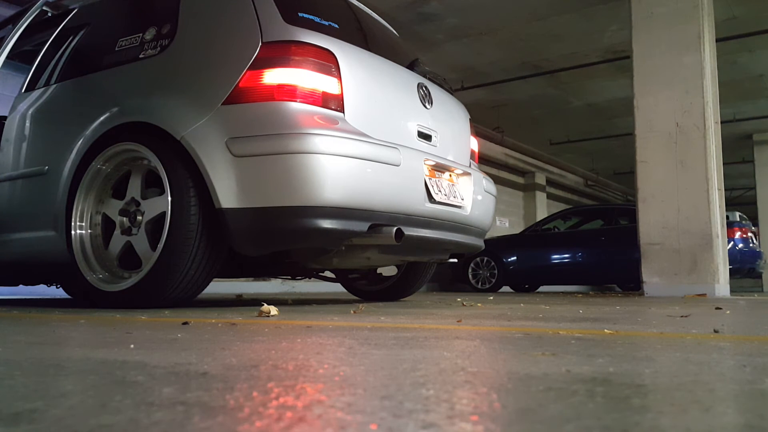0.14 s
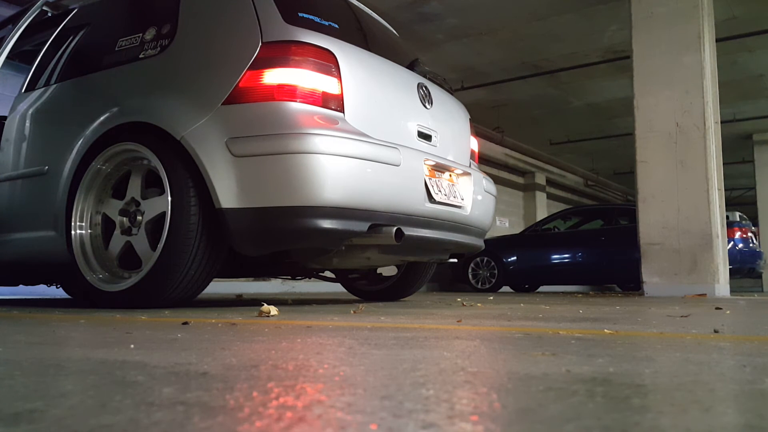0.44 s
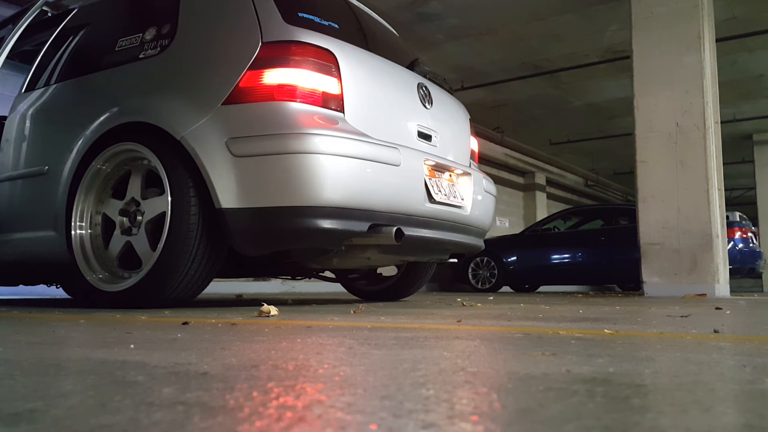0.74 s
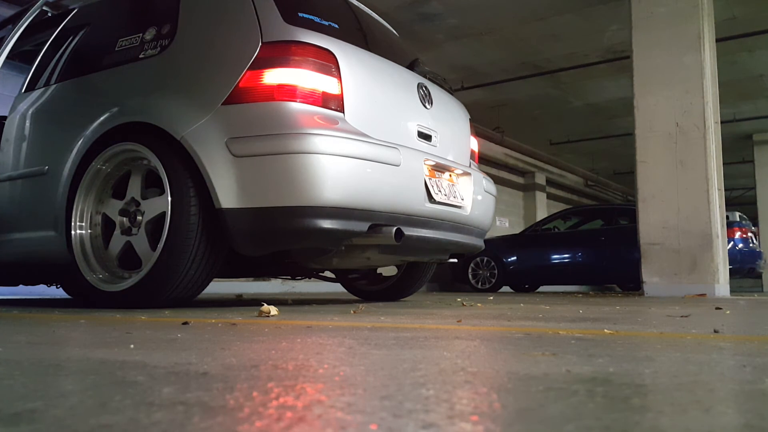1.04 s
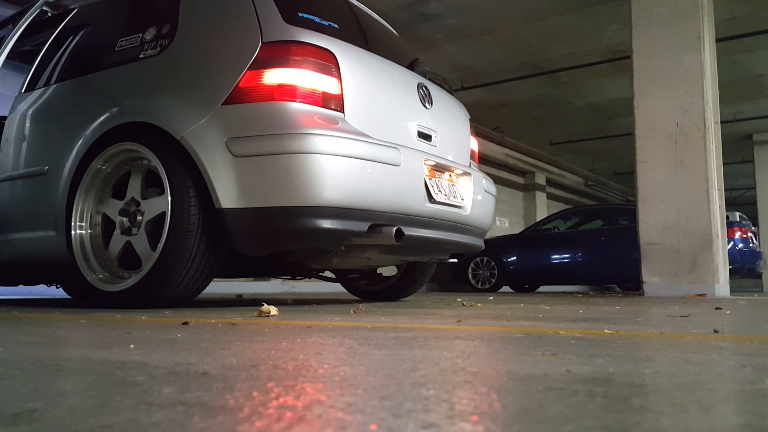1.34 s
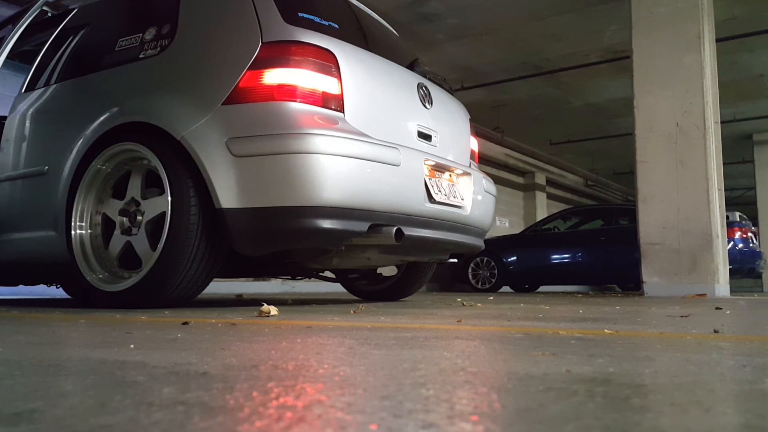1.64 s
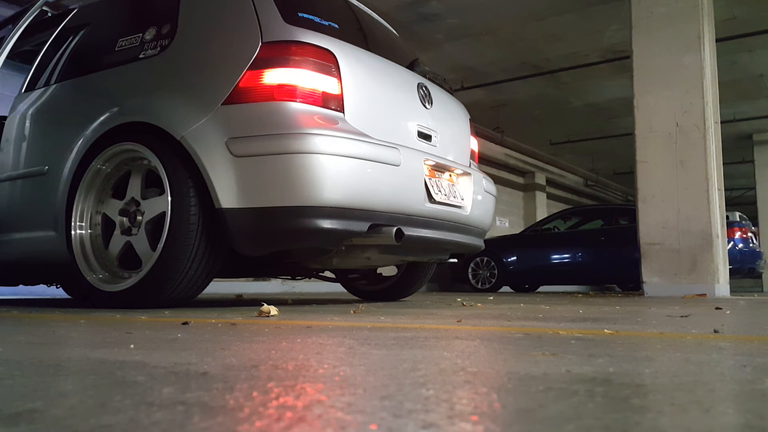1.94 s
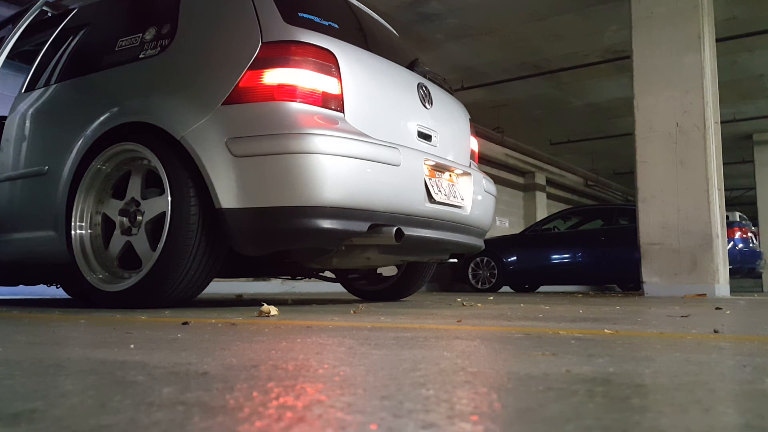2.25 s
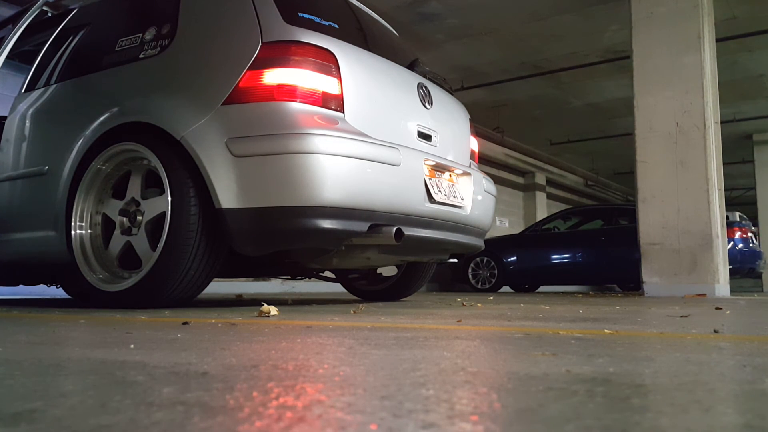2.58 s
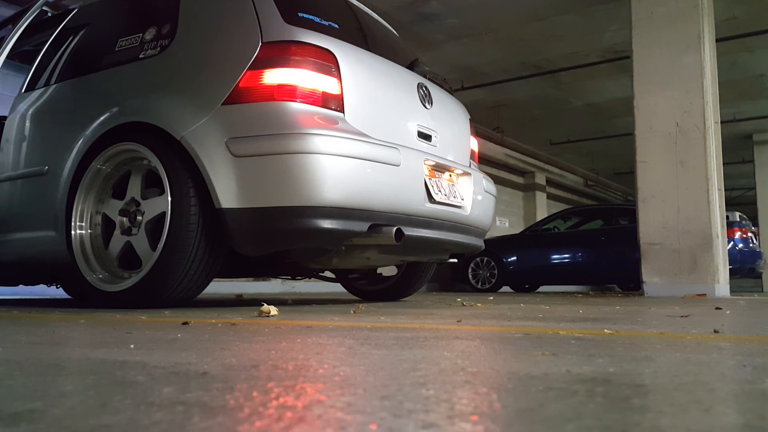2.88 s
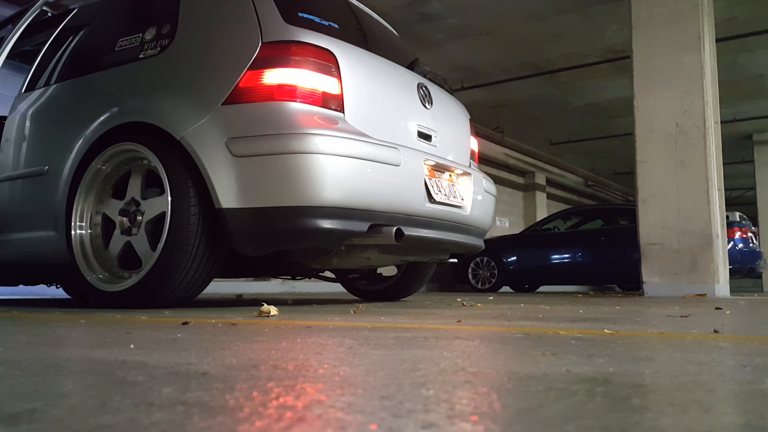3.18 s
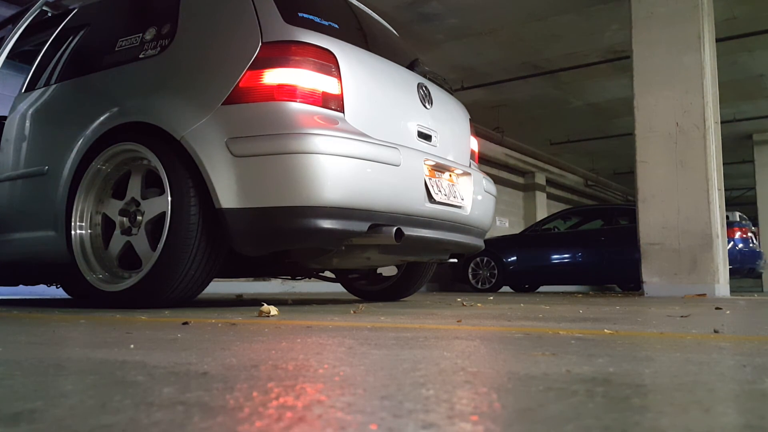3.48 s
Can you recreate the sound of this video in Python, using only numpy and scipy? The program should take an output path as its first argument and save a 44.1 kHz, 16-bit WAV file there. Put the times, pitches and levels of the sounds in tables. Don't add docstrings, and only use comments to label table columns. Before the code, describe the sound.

Rumbling car exhaust in a concrete garage, revved once sharply, with a breathy whistle sliding downward

```python
import sys
import numpy as np
from scipy import signal
from scipy.fft import rfft, irfft, next_fast_len
from scipy.io import wavfile
from scipy.ndimage import map_coordinates

SR = 44100
rng = np.random.default_rng(int(sys.argv[2]) if len(sys.argv) > 2 else 0)


def makeup_ratio(level_db):
    decades = np.asarray(level_db, float) / 20
    return 10 ** decades


def unload_wav(signal):
    wavfile.write(
        sys.argv[1],
        SR,
        np.round(np.clip(np.atleast_2d(signal).T, -1, 1) * 32767).astype(np.int16),
    )


N = 159642

# time in seconds, firings per second.
FIRING_RATE = [(0.0, 50.53), (0.16, 46.27), (0.36, 43.56), (0.58, 40.2), (0.82, 39.42), (0.92, 49.21),
               (0.99, 59.66), (1.08, 77.11), (1.14, 85.5), (1.19, 89.28), (1.37, 81.68), (1.72, 64.85),
               (2.11, 47.18), (2.25, 44.67), (2.45, 47.22), (2.7, 47.48), (2.87, 43.67), (3.62, 49.46)]
# time in seconds, level in dB, level of the second order in dB.
EXHAUST_LEVEL = [(0, -2, -9.5), (.17, -3, 0), (.3, -3.5, -2.5), (.62, 0, 4), (.78, -2.5, -11),
                 (.92, 1, 3.5), (1.03, -3.5, -8.5), (1.17, -4.5, -1.5), (1.55, -8.5, -6.5),
                 (1.72, -13.5, -9), (1.95, -2.5, -3.5), (2.25, -3.5, -4.5), (2.45, -0.5, -3.5),
                 (2.85, 0, 0), (3.1, -5, -10), (3.23, -7.5, -16), (3.45, -1.5, -7), (3.62, -7, -5)]
# time in seconds, strength of the crack at the tip in dB.
ENGINE_LOAD = [(0, -43), (.2, -38.5), (.235, -33), (.27, -50.5), (.81, -54), (.875, -24), (1.06, -23.5),
               (1.193, -28.5), (1.203, -42.5), (2.39, -45.5), (2.455, -24.5), (2.48, -52), (2.545, -26.5),
               (2.61, -27.5), (2.63, -42.5), (2.85, -41), (2.93, -61), (3.62, -58)]
# time in seconds, level in dB.
GAS_FLOW = [(0.0, -20), (0.15, -26.5), (0.67, -30.5), (0.92, -28.5), (1.05, -24.5), (1.18, -25.5),
            (1.61, -27), (2.56, -28), (2.9, -31), (3.28, -33.5), (3.62, -32)]
# time in seconds, pitch in Hz, level in dB.
TURBINE_PITCH = [(0, 4976, -41), (.4, 4080, -45.5), (.55, 3847, -39), (.7, 3760, -43.5), (.82, 3530, -56),
                 (1.0, 4960, -42.5), (1.2, 8940, -53), (1.55, 7680, -58), (1.75, 6940, -57),
                 (1.95, 6010, -48.5), (2.15, 5620, -63.5), (2.4, 4683, -42.5), (2.58, 4530, -44.5),
                 (2.74, 4287, -47.5), (3, 3890, -45.5), (3.25, 3333, -55), (3.5, 2987, -37),
                 (3.62, 2835, -45)]
# frequency in Hz, gain in dB.
TIP_COLOUR = [(2000, -3.5), (3000, 3), (3450, -1.5), (3900, 4), (4800, 4), (5700, -1), (8800, 2),
              (10200, -4)]
# centre in Hz, width in Hz, level in dB.
PIPE_MODES = [(61.5, 19.5, -7), (93.7, 40, -5), (162.2, 34, -2.5), (246.8, 55.4, -8.5), (321.7, 39.5, -9),
              (433.2, 24, -17), (543.7, 59, -17.5)]
# frequency in Hz, level in dB per Hz.
CRACK_SPECTRUM = [(180, -28), (300, 8), (385, -7.5), (587, 4), (660, 2.5), (1270, -7.5), (3060, -12.5),
                  (7140, -30.5), (9850, -37), (12800, -73), (21700, -120)]
# frequency in Hz, level in dB per Hz.
ROAR_SPECTRUM = [(180, -37.5), (300, -3.5), (579, -11), (651, -12.5), (1260, -13.5), (1950, -23.5),
                 (3870, -43), (5570, -49.5), (9850, -58.5), (12800, -89.5), (21700, -120)]
# frequency in Hz, left-right correlation.
LIKENESS = [(60, 0.96), (160, 0.96), (450, 0.6), (1240, 0.067), (3420, 0.46), (9400, 0.15)]
# frequency in Hz, radians by which left leads.
LEFT_LEAD = [(0, 0), (950, 0.1), (1290, 0.99), (5940, -0.61), (6460, -0.23), (9560, -2.4)]
# frequency in Hz, left over right in dB.
LEFT_BALANCE = [(60, -.2), (450, -.3), (1240, 1.8), (2200, -.5), (4000, -1.9), (9400, 1.8)]
# frequency in Hz, time to fall 60 dB in seconds.
GARAGE_T60 = [(100, 0.92), (1000, 1.54), (4000, 0.3), (9000, 0.13)]
# multiple of the firing rate, level in dB.
ENGINE_ORDERS = [(1, -11), (2, 3.5), (3, -2), (4, -12), (5, -11.5), (6, -13)]
# frequency in Hz, gain in dB.
ORDER_TUNING = [(47, -40.5), (56, -20.5), (66, -36), (91, -12), (115, -18.5), (128, -45.5), (140, -16),
                (170, -16.5)]


def unit(x):
    return x / np.sqrt(np.mean(x ** 2) + 1e-20)


def along(points, hz):
    f, v = np.transpose(points)
    return np.interp(np.log(hz + 1), np.log(f + 1), v)


def curve(rows, column=1):
    return np.interp(np.arange(N) / SR, *np.transpose(rows)[[0, column]])


def wobble(rate):
    knots = rng.standard_normal(int(N * rate / SR) + 4)
    return map_coordinates(knots, [np.arange(N) * rate / SR])


def filtered(x, response):
    m = next_fast_len(N + SR // 2)
    return irfft(rfft(x, m) * response(np.fft.rfftfreq(m, 1 / SR)), m)[..., :N]


def paired(pair, gain):
    def mid_side(hz):
        turn = np.arccos(np.clip(along(LIKENESS, hz), -1, 1)) / 2
        return gain(hz) * np.array([np.cos(turn), np.sin(turn)])

    mid, side = filtered(pair, mid_side)
    return np.array([mid + side, mid - side])


def firings(scatter_db, jitter_s=0., lead_s=0.):
    at = np.flatnonzero(np.diff(np.floor(np.cumsum(curve(FIRING_RATE)) / SR)))
    luck = rng.standard_normal((len(at), 2))
    when = np.round(at + (jitter_s * luck[:, 0] - lead_s) * SR).astype(int)
    cylinder_db = np.resize([0, -1, .5, -.5], len(at))
    return np.bincount(np.clip(when, 0, N - 1), makeup_ratio(cylinder_db + scatter_db * luck[:, 1]), N)


def puffs(t60_s, scatter_db):
    t = np.arange(SR // 20) / SR
    puff = makeup_ratio(-60 * t / t60_s) * (1 - np.exp(-t / .0007))
    return signal.fftconvolve(firings(scatter_db), puff)[:N]


def orders():
    unsteady_db, spread = 2.1, .13
    rate = curve(FIRING_RATE)
    turn = 2 * np.pi * np.cumsum(rate) / SR
    total = np.zeros(N)
    for k, db in ENGINE_ORDERS:
        level_db = curve(EXHAUST_LEVEL, 2 if k == 2 else 1) + db + along(ORDER_TUNING, k * rate)
        level = np.sqrt(2) * makeup_ratio(level_db + unsteady_db * wobble(18))
        total -= level * np.cos(k * turn - spread * k * k)
    return total


def boom():
    rough_db, thump_db = -7, -15.5
    thumps = firings(scatter_db=2.5, jitter_s=.0006, lead_s=0.00407)
    drive = unit(thumps) + makeup_ratio(rough_db) * rng.standard_normal(N)

    def pipe(f):
        total = 0
        for k, (centre, width, db) in enumerate(PIPE_MODES):
            damping = 1j * f * width
            total = total + (-1) ** k * makeup_ratio(db) * damping / (centre ** 2 - f * f + damping)
        return total / (1 + (f / 900) ** 2)

    return makeup_ratio(curve(EXHAUST_LEVEL) + thump_db) * unit(filtered(drive, pipe))


def roar():
    rasp_db = 2.5
    gate = 1 + .3 * unit(puffs(.08, 3))

    def colour(f):
        return makeup_ratio(along(ROAR_SPECTRUM, f) + along(TIP_COLOUR, f)) * f ** 2 / (f ** 2 + 250 ** 2)

    air = paired(rng.standard_normal((2, N)), colour)
    flow = makeup_ratio(curve(GAS_FLOW) + 2.5 + 2.2 * wobble(8.13))
    clatter = makeup_ratio(curve(ENGINE_LOAD) + rasp_db)
    return np.hypot(flow, clatter) * unit(gate * air)


def whistle():
    swing, width, puff_depth, patchy_db = .045, .135, 1.6, 2
    narrow_below_hz = 4300
    pitch = curve(TURBINE_PITCH)
    firing_cycle = np.sin(2 * np.pi * np.cumsum(curve(FIRING_RATE)) / SR)
    hz = pitch * (1 + swing * np.minimum(1, pitch / narrow_below_hz) ** 2 * firing_cycle)
    phase = 2 * np.pi * np.cumsum(hz) / SR
    knots = np.cumsum(width * hz * np.minimum(1, hz / narrow_below_hz) ** 2) / SR
    a, b = (map_coordinates(row, [knots]) for row in rng.standard_normal((2, N // 4)))
    gate = 1 + puff_depth * unit(puffs(.05, 3))
    band = unit(gate * (a * np.cos(phase) + b * np.sin(phase)))
    level = makeup_ratio(curve(TURBINE_PITCH, 2) + patchy_db * wobble(12))
    return filtered(level * band, lambda f: makeup_ratio(along(TIP_COLOUR, f)))


def crack():
    box_hz, box_width_hz, box_gain = 1360, 195, 1.98
    bright_db_per_hz, bright_from_hz = .22, 5000
    snap_db, snap_growth, snap_t60_s = -35, .8, .01
    lift_s, lift_db = 1.188, 12
    burst = unit(puffs(t60_s=.024, scatter_db=2.2)) * rng.standard_normal(N)

    def dull_and_bright(f):
        top = 1 / (1 + (bright_from_hz / (f + 1)) ** 4)
        damping = 1j * f * box_width_hz
        box = 1 + box_gain * damping / (box_hz ** 2 - f * f + damping)
        colour = makeup_ratio(along(CRACK_SPECTRUM, f) + along(TIP_COLOUR, f)) * (f > 300)
        return colour * box * np.array([1 - top, top])

    dull, bright = filtered(burst, dull_and_bright)
    speed_db = bright_db_per_hz * (curve(FIRING_RATE) - 70)
    lifted = np.abs(np.arange(N) / SR - lift_s) < snap_t60_s / 2
    snap_level = makeup_ratio(snap_db + snap_growth * speed_db + lift_db * lifted)
    snap = snap_level * unit(puffs(snap_t60_s, 3)) * rng.standard_normal(N)
    return makeup_ratio(curve(ENGINE_LOAD) + 4) * (unit(dull + makeup_ratio(speed_db) * bright) + snap)


def garage(x):
    hz, t, z = signal.stft(rng.standard_normal((2, SR)), SR, nperseg=256)
    decay = makeup_ratio(-60 * t / along(GARAGE_T60, hz)[:, None])
    tail = signal.istft(z * decay, SR, nperseg=256)[1]
    late = np.pad(x, (500, 0))[None]
    wet = signal.fftconvolve(late, tail / np.linalg.norm(tail[0]), axes=1)[:, :N]
    return paired(wet, np.ones_like)


def scene():
    steady, low, air, high, sharp = orders(), boom(), roar(), whistle(), crack()

    def microphones(f):
        return np.exp(.5j * along(LEFT_LEAD, f) * np.array([[1], [-1]]))

    wet = garage(makeup_ratio(-5) * low + makeup_ratio(-7.5) * sharp + makeup_ratio(-4) * high)
    return filtered(steady + low + sharp + high, microphones) + wet + air


def low_pass(x):
    return signal.sosfilt(signal.butter(12, 15830, fs=SR, output="sos"), x)


def record(dry):
    low_cut_hz, hiss_db, tick_db, tick_t60_s = 46, -64.5, -33, 0.013

    def mic(f):
        balance = makeup_ratio(along(LEFT_BALANCE, f) * np.array([[.5], [-.5]]))
        return balance / np.sqrt(1 + (low_cut_hz / (f + 1)) ** 6)

    hiss = makeup_ratio(hiss_db) + makeup_ratio(tick_db - 60 * np.arange(N) / SR / tick_t60_s)
    x = filtered(dry, mic) + hiss * rng.standard_normal(dry.shape)
    clipped = x / (1 + np.abs(x / 1.05) ** 5) ** (1 / 5)
    fade_out = np.minimum(1, np.arange(N)[::-1] / 150)
    return low_pass(clipped * fade_out)


dry = scene()
out = record(dry)
unload_wav(out)
```